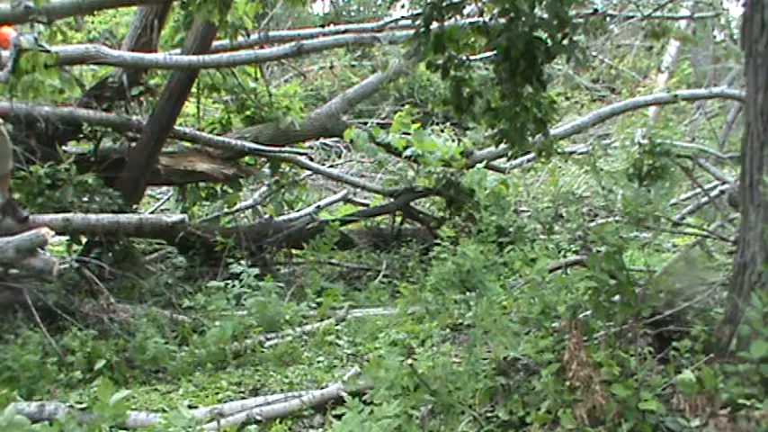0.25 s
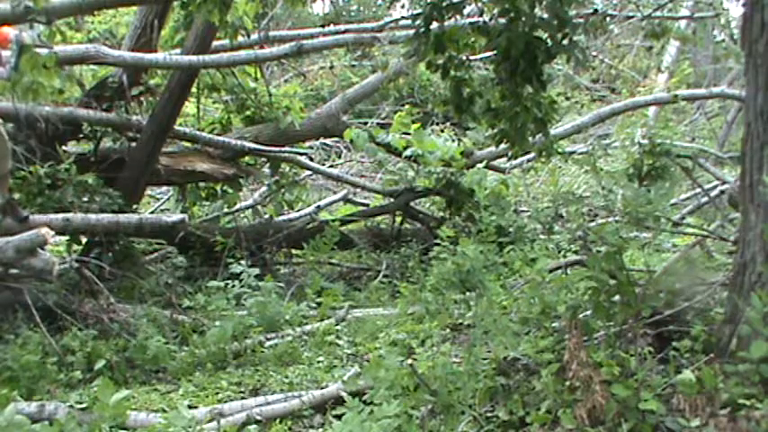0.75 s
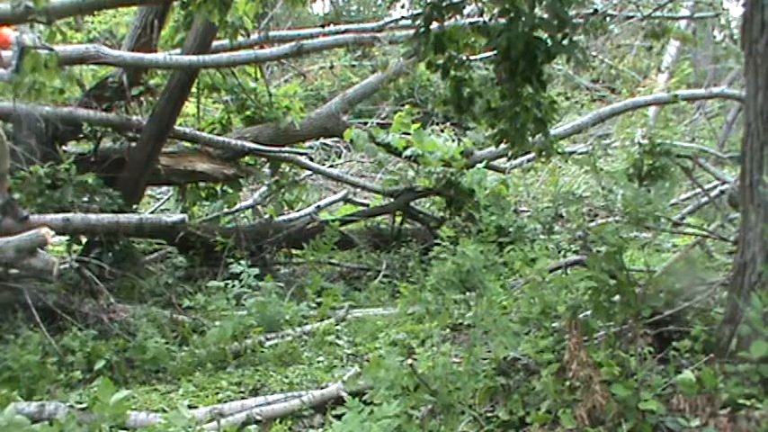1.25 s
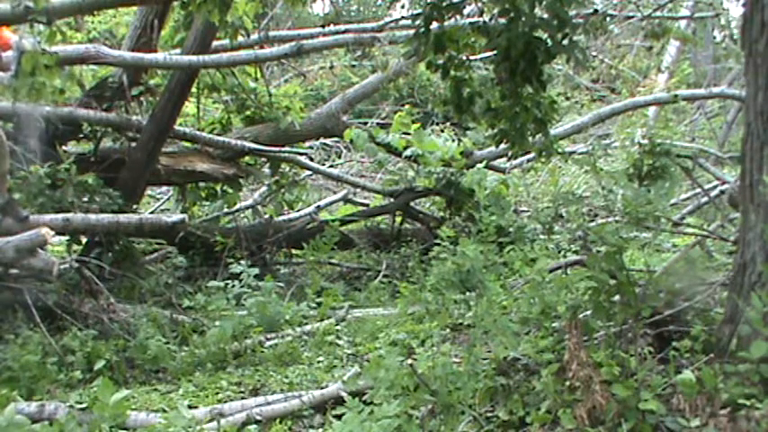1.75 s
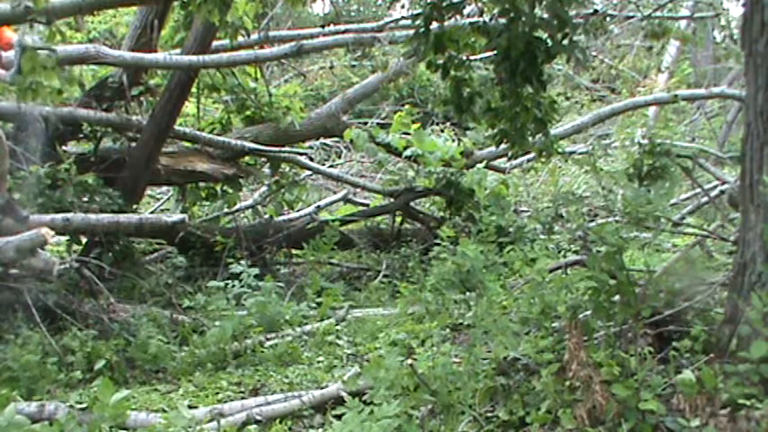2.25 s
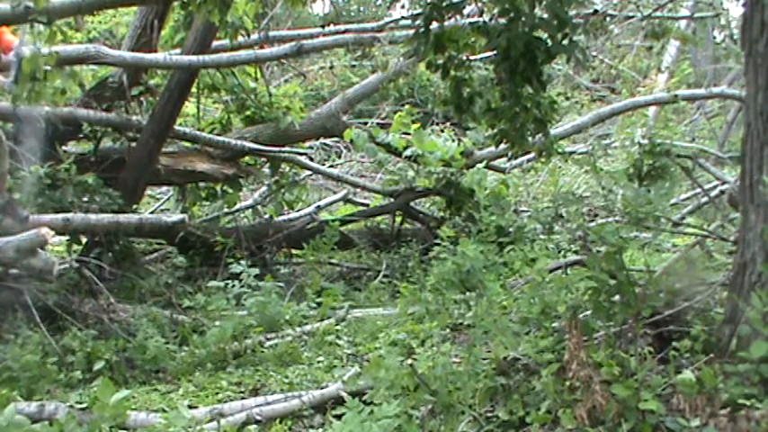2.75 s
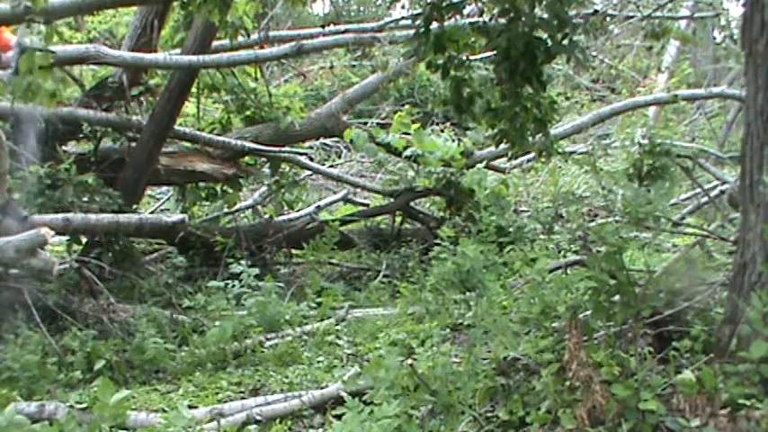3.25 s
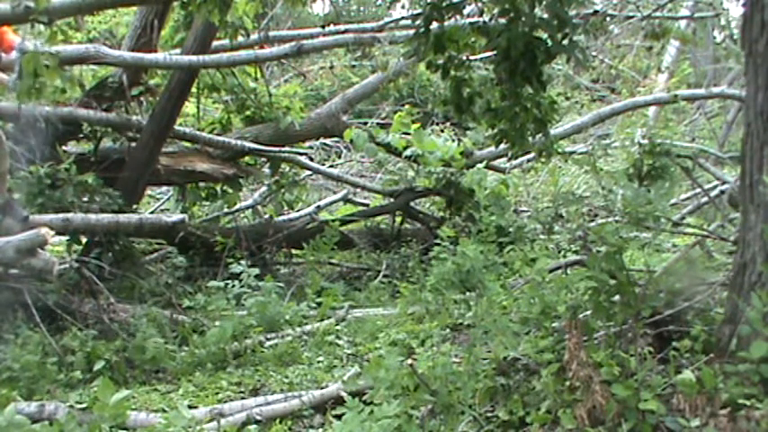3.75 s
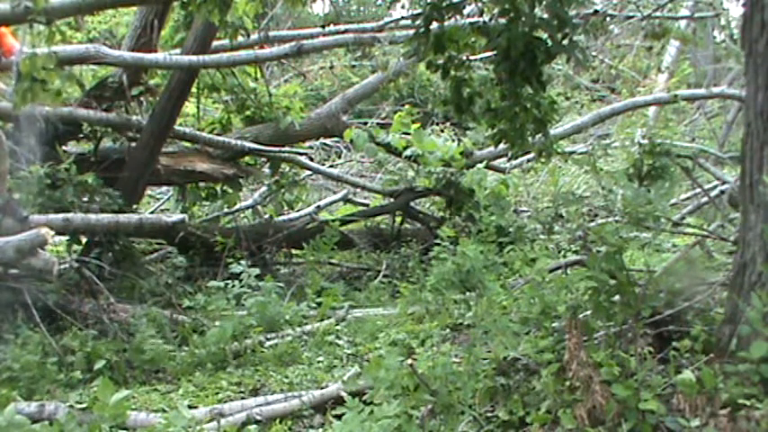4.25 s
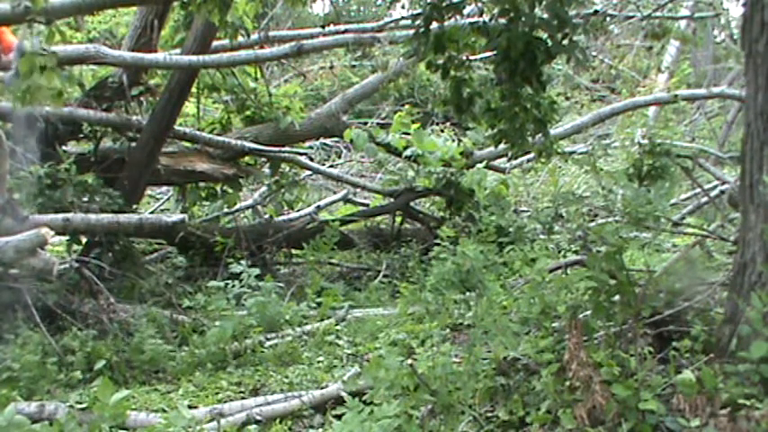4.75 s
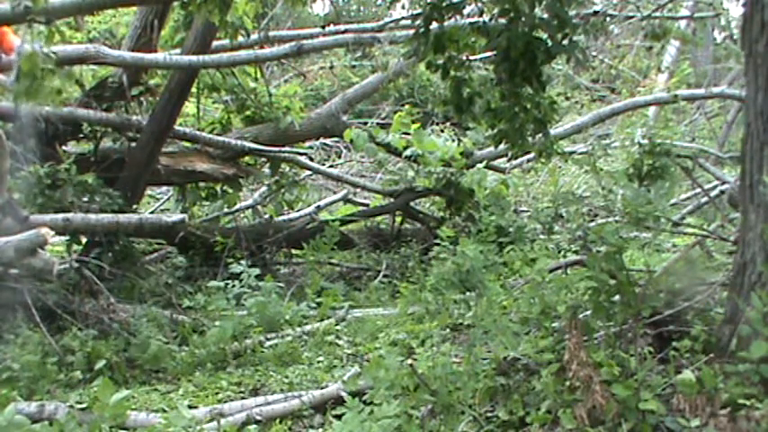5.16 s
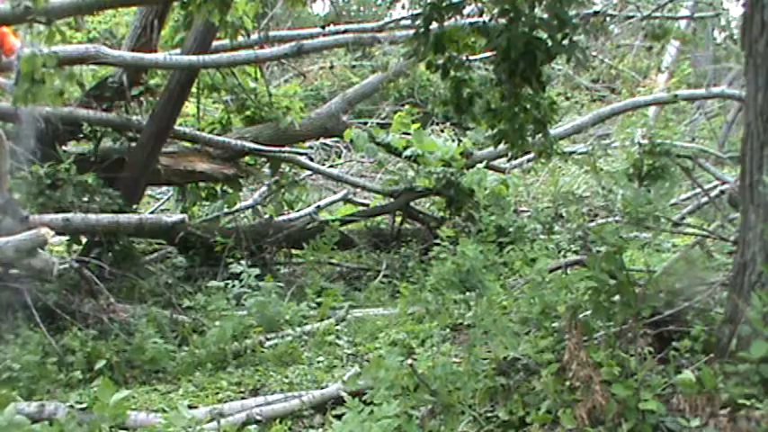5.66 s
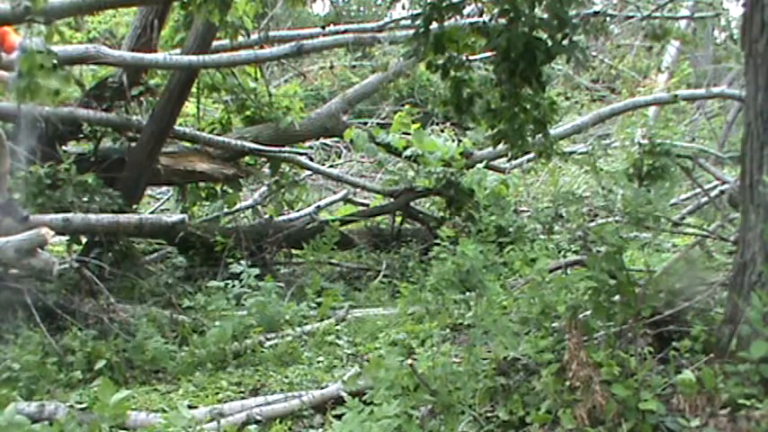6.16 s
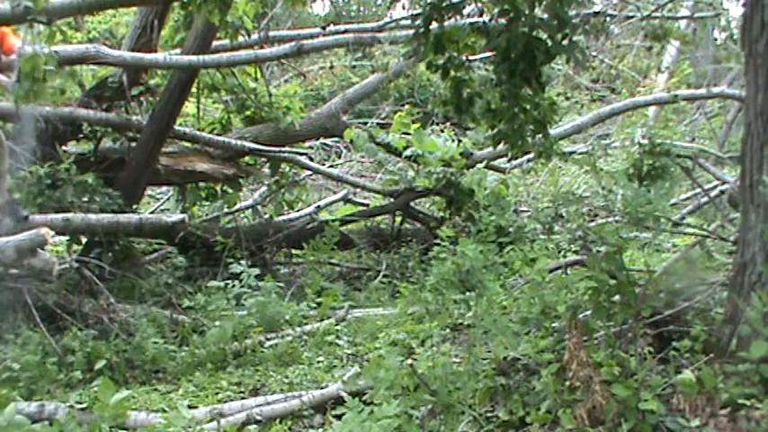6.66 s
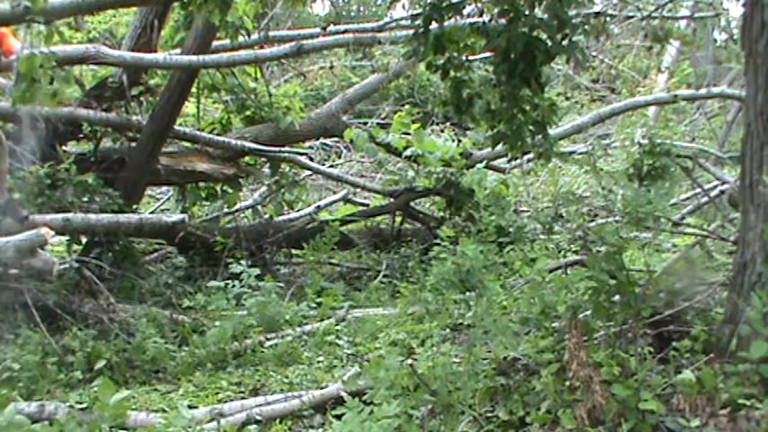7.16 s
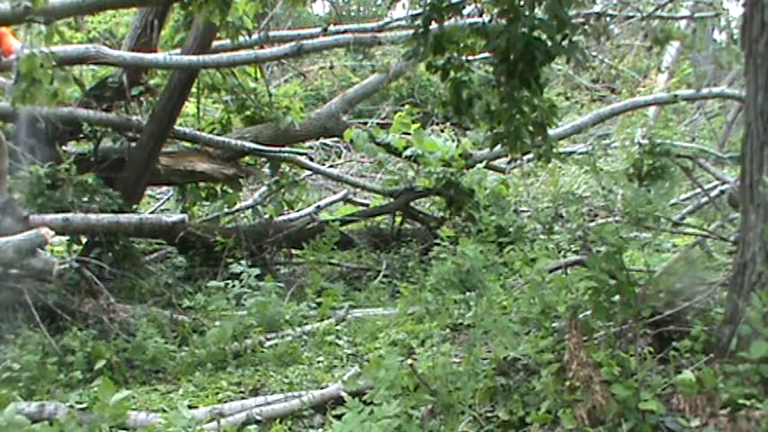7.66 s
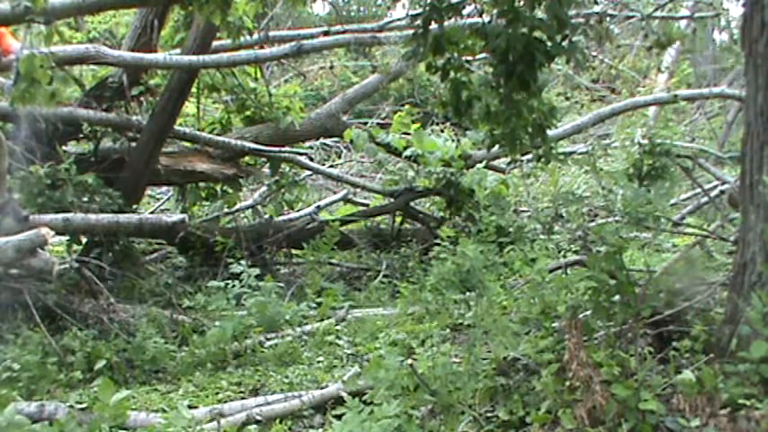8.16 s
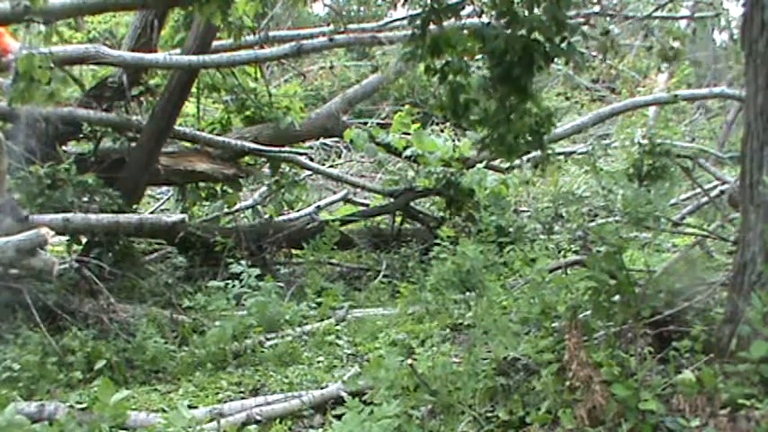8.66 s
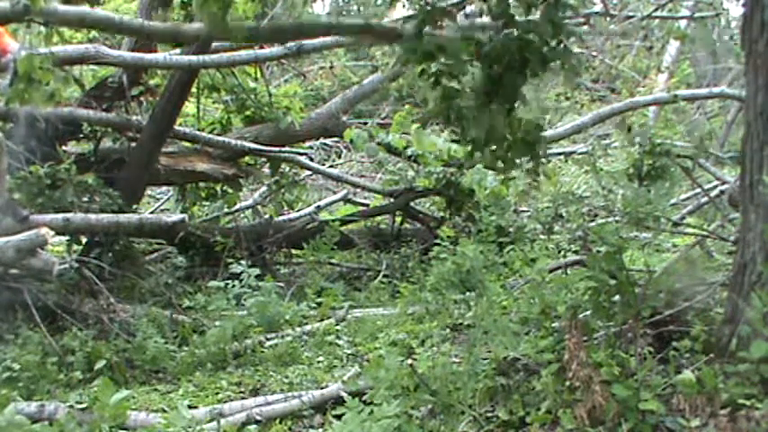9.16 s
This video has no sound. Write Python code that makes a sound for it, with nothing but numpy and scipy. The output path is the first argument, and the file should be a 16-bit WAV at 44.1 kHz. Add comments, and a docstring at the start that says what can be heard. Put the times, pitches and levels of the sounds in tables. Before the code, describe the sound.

In quiet woods, a switch clunk starts an electric saw's raspy whine, which dips, wavers and rises while a branch snaps.

```python
"""In the woods, an electric chainsaw ahead of a stereo microphone is switched on and cuts a limb.
The links whine as near-pure partials whose pitch sags under load and climbs as the cut opens.
Noise of the cutters rasps through housing and bar resonances; bursts into wood modes crack the limb near the end.
Low sine orders of a small engine drone far off over soft coloured noise;
an insect's two-partial wing beat swells up twice on the left."""
import sys
import numpy as np
from scipy import signal
from scipy.fft import rfft, irfft, next_fast_len
from scipy.io import wavfile

SR = 44100
rng = np.random.default_rng(int(sys.argv[2]) if len(sys.argv) > 2 else 0)


def wav_out(sig):
    """Save sig, one row per channel (or a flat mono array), as 16-bit PCM at SR to the path in sys.argv[1]."""
    wavfile.write(sys.argv[1], SR, np.round(np.clip(np.atleast_2d(sig).T, -1, 1) * 32767).astype(np.int16))


N = 414981

# resonances of the plastic housing and bar: (frequency [Hz], width [Hz], level [dB])
HOUSING = [(599, 110, -11), (1029, 133, 0.5), (1223, 313, -3), (1503, 333, -6.5), (2035, 153, -5),
           (2248, 250, -4.5), (2557, 138, -8.5)]
# a sharp housing mode that the partials cross on the way up: (frequency [Hz], width [Hz], level [dB])
SHELL_RING = (2240, 65, 6)


def saw():
    """One chain drives the tonal whine, the cutting noise and the sound in the side signal."""
    rate, turns, load, slack = chain()
    running = fade_in(.13, 0.058)
    tones = running * whine(rate, turns, slack)
    noise = cutting_noise(turns, load, slack, running)
    from_the_side = running * side_sound(turns, load, slack)
    return tones, noise, from_the_side


def chain():
    """Link rate with run-up and lap surge, its phase in turns, the load, and the slack left of the run-up."""
    # the chain under its load, once run up: (time [s], rate [link strikes per s])
    speed = [(0.2, 567.4), (0.6, 560.8), (1.12, 582.9), (1.5, 558.1), (1.8, 545.1), (1.89, 554.4),
             (2.07, 541.8), (2.25, 537.5), (2.54, 512.5), (2.74, 540.4), (3.03, 550.7), (3.3, 540.3),
             (3.44, 523.9), (3.52, 530.3), (3.7, 497.4), (3.78, 500.7), (3.88, 515.8), (4.7, 528.9),
             (4.95, 540.6), (5.08, 518.5), (5.33, 480.5), (5.5, 504.5), (5.85, 501.1), (6.25, 502.1),
             (6.55, 488.3), (6.74, 508.1), (7.08, 507.1), (7.5, 523.1), (8.05, 540.0), (8.4, 563.8),
             (8.9, 605.1), (9.25, 633.2), (9.41, 637.2)]
    switch_on_s, run_up_s = .095, .21   # the motor closes on that speed exponentially
    free_speed = 600   # link strikes per s with the bar out of the wood; the shortfall is the load
    links_in_loop = 62
    surge_share, surge_phase = 0.018, -0.5   # a stiff link surges once a lap: share of the load, radians
    loaded, = in_time(speed)
    slack = np.exp(-np.maximum(np.arange(N) / SR - switch_on_s, 0) / run_up_s)
    load = np.maximum(free_speed - loaded, 0)
    rate = loaded * (1 - slack)
    laps = np.cumsum(rate) / SR / links_in_loop
    rate = rate + surge_share * load * (1 - slack) * np.sin(2 * np.pi * laps + surge_phase)
    turns = np.cumsum(rate * (1 + 0.002 * drift(26.0))) / SR   # the chain hunts a little; one turn per link
    return rate, turns, load, slack


def whine(rate, turns, slack):
    """Near-pure partials on the link rate, weighted by how strongly each pitch is heard."""
    # how strongly a partial is heard at each pitch: (frequency [Hz], level [dB])
    radiation = [(150, -51), (300, -31), (450, -24), (490, -32), (510, -29.5), (525, -43), (540, -27.5),
                 (560, -26), (580, -29.5), (597, -25), (640, -27.5), (760, -28), (900, -23.5), (970, -14),
                 (1050, -13.5), (1100, -15.5), (1150, -21.5), (1195, -18.5), (1245, -28), (1280, -26.5),
                 (1400, -17.5), (1480, -30), (1600, -28.5), (1660, -26), (1780, -34), (1850, -32),
                 (1920, -27.5), (2120, -35), (2200, -23.5), (2300, -21.5), (2380, -31.5), (2420, -75),
                 (2560, -16)]
    # partials: (multiple of the link rate, level [dB], share of the balance swing, wander [dB])
    partials = [(1, 0.5, -0.69, 1.), (2, 0.5, 0.95, .5), (3, -4.5, -0.69, 1.6), (4, -8.5, -1.1, 2)]
    # level swing of the second partial against the others: (time [s], level [dB])
    balance = [(.3, 1.5), (1.1, -5), (1.3, -1.5), (1.5, -4), (1.7, -1.5), (1.95, -4), (2.2, -2), (2.55, -3),
               (2.7, 1.5), (3.15, 2), (3.4, -5.5), (3.75, 0.5), (3.92, -2.5), (4.7, 1.5), (4.95, -2.5),
               (5.55, 0), (6.3, 0.2), (6.5, -2), (6.68, -0.5), (7.3, -2), (7.9, 1.5), (8.15, -0.5),
               (8.55, 1.5), (8.72, -4.5), (9.41, 7.5)]
    # slower shafts: (multiple of the link rate, level [dB])
    sprocket = [(.43, -67), (.53, -49)]
    slack_db, slack_flutter_db = -2, 10   # a slack chain whines weakly and drops out in patches
    balance_db, = in_time(balance)
    # a cutter snags and the whine drops out for an instant
    stumble_db = -np.clip(3.2 * (drift(36) - 1.5), 0, 7)
    stumble_db = stumble_db + slack * (slack_db - slack_flutter_db * np.abs(drift(20.)))
    out = comb(turns, sprocket, wander_db=0.5)
    for k, db, share, wander_db in partials:
        level_db = at_hz(radiation, k * rate + 1) + db + share * balance_db + stumble_db
        level_db = level_db + wander_db * drift(6.) + 0.47 * drift(63)
        phase = 2 * np.pi * k * turns + 0.018 * drift(58)
        out = out + np.sqrt(2) * amp(level_db) * np.sin(phase)
    return out


def cutting_noise(turns, load, slack, running):
    """Link-pulsed noise in three layers: housing clatter, chain hiss and wood rumble; slack adds a rattle."""
    # level of the chain hiss: (time [s], level [dB])
    rasp = [(.14, -35.5), (.21, -23.5), (.44, -20), (.51, -23.5), (1.25, -20.5), (1.6, -22.5), (2.4, -22),
            (2.7, -24), (3.16, -24.5), (3.47, -21.5), (3.96, -23.5), (5.35, -24.5), (7.5, -24),
            (8.25, -23.5), (8.66, -21.5), (9.0, -20.5), (9.41, -20)]
    # cutters in the wood: (frequency [Hz], level per Hz [dB])
    rumble_colour = [(88, -57), (150, -31), (210, -35), (280, -4.5), (362, -2.5), (448, -7), (480, -8),
                     (620, -16), (1060, -120)]
    clatter_db, clatter_follows = -25.5, 0.63   # level at the mean rasp; share of the rasp's swing
    rumble_db, rumble_follows = -39, 0.96
    slack_rattle_db = -16   # a slack chain rattles the sharp housing mode
    hiss_db, = in_time(rasp)
    swing_db = hiss_db - hiss_db.mean()
    upper, faint = upper_partials(turns, running)
    links = grit(turns, pulsing=0.099, rough_db=1.0)

    clatter = rms_one(housing(grit(turns, pulsing=0.11, rough_db=1.0)))
    clatter = clatter + housing(amp(2.5) * upper + amp(5.0) * faint)
    hiss = chain_hiss(turns, links, upper, load, slack)
    rumble = rms_one(colour(grit(turns, pulsing=0.22, rough_db=-3.5), rumble_colour))
    ring_hz, ring_width_hz = SHELL_RING[:2]
    rattle = amp(4.0 * drift(30.)) * rms_one(resonance(links, ring_hz, ring_width_hz))
    rattle = amp(slack_rattle_db) * slack * (1 - slack) * rattle   # strongest midway through the run-up

    noise = amp(clatter_db + clatter_follows * swing_db) * clatter
    noise = noise + amp(hiss_db) * hiss
    noise = noise + amp(rumble_db + rumble_follows * swing_db) * rumble + rattle
    bite_db = 0.59 * drift(9.2)   # pressure on the bar wavers, all layers follow
    return fade_in(.098, 0.0015) * amp(bite_db) * noise


def upper_partials(turns, running):
    """Higher link partials, and faint ones from uneven sprocket teeth and the spacing of the cutters."""
    # heard only through housing and bar: (multiple of the link rate, level [dB])
    upper = [(5, -2), (6, 2), (7, -4.5), (8, -8.5)]
    sprocket_teeth = 7
    jitter_turns = .011   # blurs the higher partials
    blurred = running * comb(turns + jitter_turns * drift(50), upper, wander_db=1.5)
    # one pattern per sprocket turn
    uneven_teeth = [(k / sprocket_teeth, -17) for k in range(10, 33) if k % sprocket_teeth]
    # every second link carries a cutter
    cutters = [(k + .5, -12) for k in range(1, 5)]
    faint = running * comb(turns, uneven_teeth + cutters, wander_db=1.5)
    return blurred, faint


def chain_hiss(turns, links, upper, load, slack):
    """Chain sliding on the bar: coloured noise, steel modes, singing partials and a bright spray."""
    # chain on bar: (frequency [Hz], level per Hz [dB])
    slide_colour = [(1500, -17), (2600, -7.5), (2830, -6), (3100, -4.5), (4000, -6.5), (5000, -7),
                    (6200, -5), (7200, -4.5), (9300, -4.5), (11000, -6.5), (14000, -12.5), (16000, -25)]
    # steel bar and chain: (frequency [Hz], width [Hz], level [dB])
    bar = [(3230, 200, -4.5), (4280, 240, -3), (4600, 260, 2.5), (5425, 186, 3.5), (5940, 270, -3.5),
           (6520, 150, -2.5), (8610, 700, -2.5), (9880, 470, -0.5)]
    # higher partials sing on a free bar, are damped by the load, and sing out while the chain is slack
    free_singing_db, singing_db_per_load, slack_singing_db = -2.5, -.09, 5
    # the hiss is brighter on a lightly loaded chain
    spray_hz, spray_db, spray_db_per_load = 8060, -8, -0.0727
    rivets = grit(turns, pulsing=0.13, rough_db=0.6)
    steel = rms_one(modes(rivets, bar, wander_db=1.2))
    hiss = rms_one(rms_one(colour(links, slide_colour)) + amp(-3.0) * steel)
    singing_db = free_singing_db + singing_db_per_load * load + slack_singing_db * slack + 3.4 * drift(20.0)
    singing = modes(upper, [SHELL_RING] + bar[2:3], wander_db=0.0)
    spray = signal.sosfilt(signal.butter(2, spray_hz, "high", fs=SR, output="sos"), rivets)
    return hiss + amp(singing_db) * singing + amp(spray_db + spray_db_per_load * load) * spray


def side_sound(turns, load, slack):
    """First partial from the side, without the dip the whine has near 525 Hz, and steady low air noise."""
    # low air noise, different at the two microphones: (frequency [Hz], level per Hz [dB])
    air_colour = [(30, -30), (70, -8), (150, 0.), (400, 1), (1000, -1), (1600, -28)]
    air_db = -50.5
    tone_db, tone_db_per_load = -43.5, -0.0742
    tone = amp(tone_db + tone_db_per_load * load) * (1 - slack) ** 2 * -np.cos(2 * np.pi * turns)
    air = rms_one(colour(rng.standard_normal(N), air_colour))
    return tone + amp(air_db) * air


def grit(turns, pulsing, rough_db):
    """Noise that swells with each link and is lumpy from chip to chip."""
    swell = 1 + np.clip(pulsing, 0, 1) * np.cos(2 * np.pi * turns)
    return rng.standard_normal(N) * swell * amp(rough_db * drift(150))


def housing(x):
    """The plastic shell as parallel resonances."""
    return modes(x, HOUSING, wander_db=1.7)


def cracks():
    """Each break of the limb as a short burst, and fine tearing between, all into the wood's modes."""
    # the limb breaks: (time [s], relative level [dB], treble tilt [dB per octave])
    breaks = [(8.669, -9, -1), (8.699, -15, -6), (8.893, -12.5, 2.5), (8.919, -22, -1), (8.947, -17, 3),
              (8.957, -9.5, 1), (9.039, -18, 3), (9.105, -17, -1), (9.208, -22.5, 5.5), (9.248, -18, -6)]
    # modes of the wood: (frequency [Hz], level [dB], t60 [s])
    limb = [(196, -23, 0.058), (316, -6.5, 0.032), (520, 0, 0.009), (1000, -8, 0.006), (1870, 1, 0.0089),
            (2980, 7, 0.0029), (3820, -9, 0.0028), (5300, -24, 0.0019), (7000, -29, 0.0022)]
    # fibres tearing: (time [s], level [dB])
    splintering = [(8.6, -60), (8.68, -36), (8.8, -37), (8.93, -29), (9.05, -35), (9.41, -50)]
    decay_s, fibres_per_s = .0035, 450   # a break dies fast; fibres tear at random between
    out, t = np.zeros(N), np.arange(900) / SR
    bursts = rng.standard_normal((len(breaks), 900)) * np.exp(-t / decay_s)
    tearing_db, = in_time(splintering)
    torn = rng.random(N) < fibres_per_s / SR
    strength = amp(4.4 * np.minimum(rng.exponential(1, N), 2.5))
    fibres = torn * strength * rng.choice([-1, 1], N)
    for hz, db, t60 in limb:
        blows = np.r_[fibres * amp(tearing_db + db), np.zeros(900)]
        for (s, level_db, treble_db), burst in zip(breaks, bursts):
            start = round(s * SR)
            burst_db = level_db + db - 22.5 + treble_db * np.log2(hz / 320)
            blows[start:start + 900] += burst * amp(burst_db)
        r, w = amp(-60 / (t60 * SR)), 2 * np.pi * hz / SR
        # the tiny offset keeps the filter clear of denormal numbers
        out += signal.lfilter([1, 0, -1], [1, -2 * r * np.cos(w), r * r], blows[:N] / 2 + 1e-18)
    return out


def switch():
    """The trigger clunks home: short noise knocks ring the housing."""
    # knocks: (time [s], level [dB])
    clunks = [(.092, -21), (0.101, -9), (.104, -16.5), (.113, -13)]
    decay_s, snap_db = 0.0081, -27   # each knock dies away; part of it is heard bare, not through the shell
    knocks, t = np.zeros(SR // 4), np.arange(1500) / SR
    for (s, db), burst in zip(clunks, rng.standard_normal((len(clunks), 1500))):
        start = round(s * SR)
        knocks[start:start + 1500] += amp(db) * burst * np.exp(-t / decay_s)
    rung = sum(amp(db) * resonance(knocks, hz, width) for hz, width, db in HOUSING + [SHELL_RING])
    return np.r_[rung + amp(snap_db) * knocks, np.zeros(N - len(knocks))]


def trunks(x):
    """Scattered echoes off nearby trunks: a decaying random tail, unrelated to the direct sound."""
    t = np.arange(9000) / SR
    scatter = rng.standard_normal(9000) * np.exp(-t / .05)
    return signal.fftconvolve(x, scatter / np.sqrt(np.sum(scatter ** 2)))[:N]


def insect():
    """Wing beat with a weak second partial: it swells and rises on the way in and is gone at once."""
    # two passes: (nearest [s], wing beat there [Hz], level there [dB])
    passes = [(2.36, 424, -31), (3.9, 428, -35)]
    approach_db_per_s, leave_db_per_s, glide_hz_per_s = 75, 900, 70
    out = 0
    for s, hz, db in passes:
        t = np.arange(N) / SR - s
        beat = 2 * np.pi * (hz * t + glide_hz_per_s * t * t / 2)
        level_db = db + np.minimum(approach_db_per_s * t, -leave_db_per_s * t)
        out = out + amp(level_db) * (np.sin(beat) + .35 * np.sin(2 * beat))
    return out


def engine():
    """Low orders of a distant engine, each fading on the air."""
    # orders of the firing rate: (multiple, level [dB])
    orders = [(3, -26), (4, -4), (5, -10), (6, 4.5), (8, 1), (10, -24), (12, -10), (13, -26)]
    # drone over time: (time [s], level of multiples up to 6 [dB], level of those above [dB])
    drone = [(0.0, -45, -44.5), (0.31, -46, -46.5), (0.9, -45.5, -53), (3.0, -53.5, -54), (4.6, -64, -51),
             (5.2, -55, -50), (6.9, -49, -50), (7.4, -60, -52.5), (8.15, -54, -45), (8.72, -48, -47.5),
             (9.41, -53, -48)]
    firing_hz = 15.6   # one firing every two turns of the shaft
    low_db, high_db = in_time(drone)
    firings = np.cumsum(firing_hz * (1 + 0.0032 * drift(2.3))) / SR
    out = 0
    for k, db in orders:
        level_db = db + (low_db if k <= 6 else high_db) + 0.81 * drift(7.5)
        out = out + amp(level_db) * np.sin(2 * np.pi * (k * firings + rng.random()))
    return out


def woods():
    """Far background of the woods: steady coloured noise."""
    # (frequency [Hz], level per Hz [dB])
    background = [(25, -40), (40, -22), (55, 2.5), (110, -17), (160, -19), (250, 0), (500, -5), (2900, -17),
                  (15000, -33)]
    return amp(-44) * rms_one(colour(rng.standard_normal(N), background))


def amp(db):
    """Decibels to gain."""
    return np.exp(np.asarray(db) * (np.log(10) / 20))


def rms_one(x):
    """Scale to unit rms."""
    return x / np.sqrt(np.mean(x ** 2) + 1e-20)


def in_time(rows):
    """One value per sample for each column after the time."""
    s, *columns = np.transpose(rows)
    return [np.interp(np.arange(N) / SR, s, c) for c in columns]


def at_hz(points, hz):
    """Read a (frequency [Hz], level [dB]) table along log frequency."""
    table_hz, table_db = np.array(points).T
    return np.interp(np.log(hz), np.log(table_hz), table_db)


def fade_in(start_s, length_s):
    """Straight rise from 0 to 1."""
    return np.clip((np.arange(N) / SR - start_s) / length_s, 0, 1)


def colour(x, points):
    """Filter by a (frequency [Hz], level [dB]) table."""
    size = next_fast_len(N)
    hz = np.maximum(np.arange(size // 2 + 1) * SR / size, 1)
    return irfft(rfft(x, size) * amp(at_hz(points, hz)), size)[:N]


def drift(rate):
    """Slow random wander of unit rms, made at every 40th sample; a higher rate wanders faster."""
    r = np.exp(-80 * np.pi * rate / SR)
    slow = signal.lfilter([1], [1, -2 * r, r * r], rng.standard_normal(N // 40 + 3002))
    slow = slow[3000:]   # drop the filter's start
    return np.interp(np.arange(N) / 40, np.arange(len(slow)), rms_one(slow - slow.mean()))


def resonance(x, hz, width_hz):
    """Two-pole peak of gain 1."""
    r = np.exp(-np.pi * width_hz / SR)
    poles = [1, -2 * r * np.cos(2 * np.pi * hz / SR), r * r]
    return signal.lfilter([(1 - r * r) / 2, 0, (r * r - 1) / 2], poles, x)


def modes(x, table, wander_db):
    """Parallel modes with alternating signs; each wanders slowly in level on its own."""
    out = 0
    for k, (hz, width, db) in enumerate(table):
        out = out + (-1) ** k * amp(db + wander_db * drift(0.44)) * resonance(x, hz, width)
    return out


def comb(turns, orders, wander_db):
    """Sines at multiples of the link rate, each wandering in level."""
    out = 0
    for k, db in orders:
        out = out + amp(db + wander_db * drift(4.6)) * np.sin(2 * np.pi * (k * turns + rng.random()))
    return out


def scene():
    """Saw ahead and a little left, engine further left, insect on the left; echoes give the width."""
    # echoes, side against mid: (frequency [Hz], level [dB])
    spread = [(60, -34), (130, -3.5), (250, -15.5), (600, -6), (1200, -10.5), (2050, -29), (2600, -8.5),
              (3600, -57), (4800, -9.5), (6500, -19), (9000, -14.5), (13000, -5)]
    far = engine() + woods()
    tones, rasp, from_the_side = saw()
    rasp = rasp + cracks() + switch()
    # tones reach the two microphones in slightly different phase
    shifted = signal.hilbert(0.13 * tones + 0.15 * far, next_fast_len(N))[:N].imag
    side = colour(trunks(rasp), spread) + shifted + from_the_side
    ahead = (tones + rasp) * amp([[.35], [-.35]])
    distant = far * amp([[1.1], [-1.1]])
    # the insect's two values are plain gains, not dB
    return ahead + distant + side * [[1], [-1]] + insect() * [[1.3], [-.3]]


def record(dry):
    """The microphone's peaks are rounded, the top is cut above 15730 Hz."""
    cut = signal.ellip(12, .3, 70, 15730, fs=SR, output="sos")
    return signal.sosfilt(cut, 0.88 * np.tanh(dry / 0.89))


dry = scene()
out = record(dry)
wav_out(out)
```